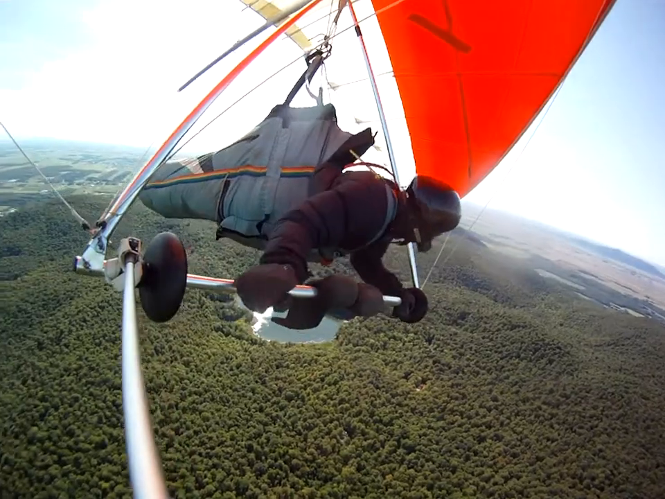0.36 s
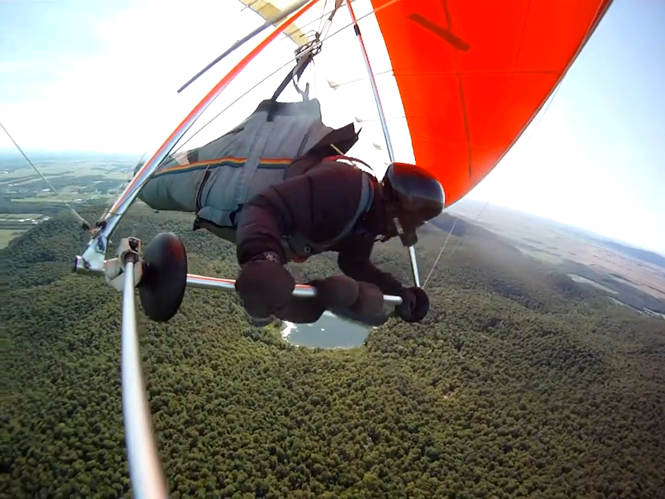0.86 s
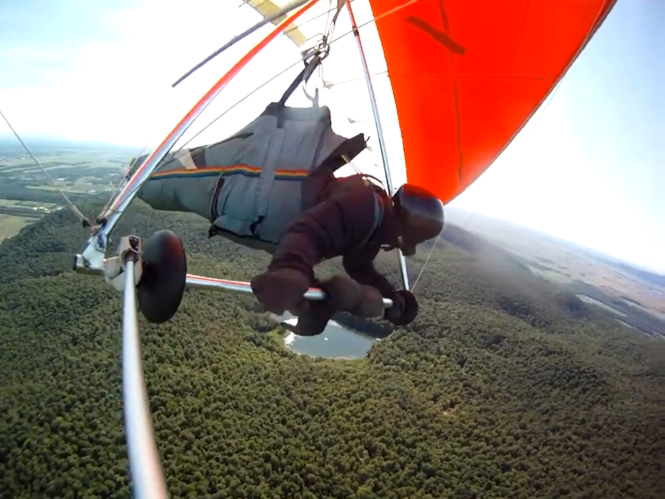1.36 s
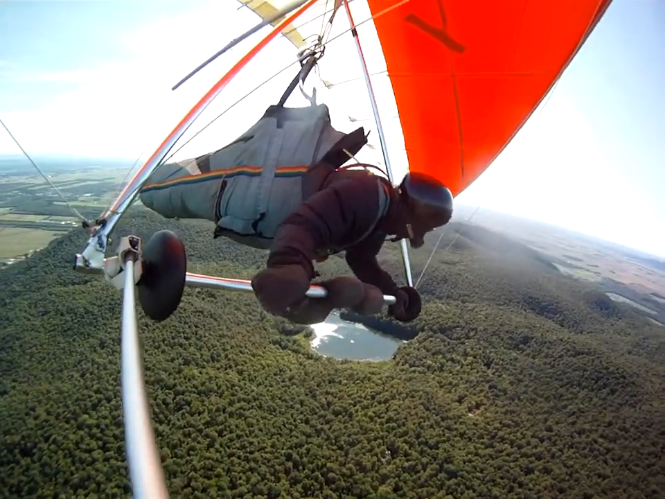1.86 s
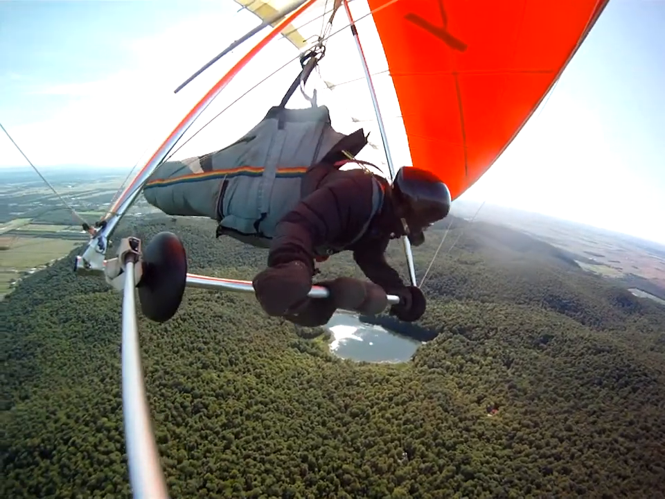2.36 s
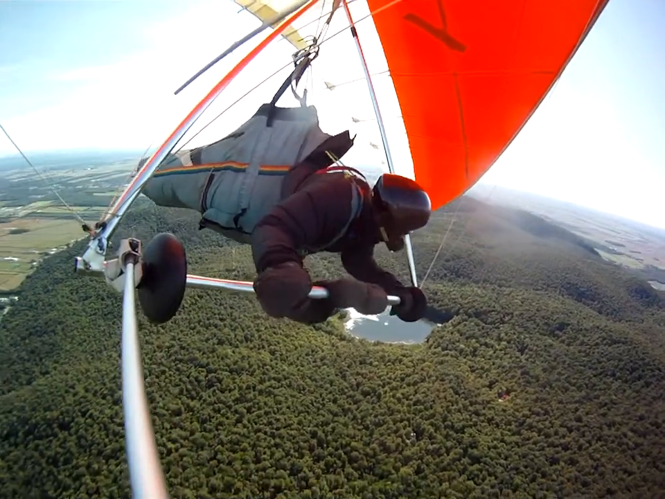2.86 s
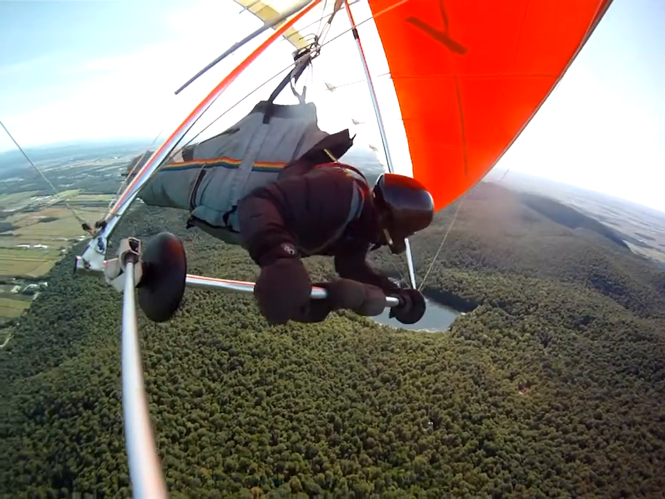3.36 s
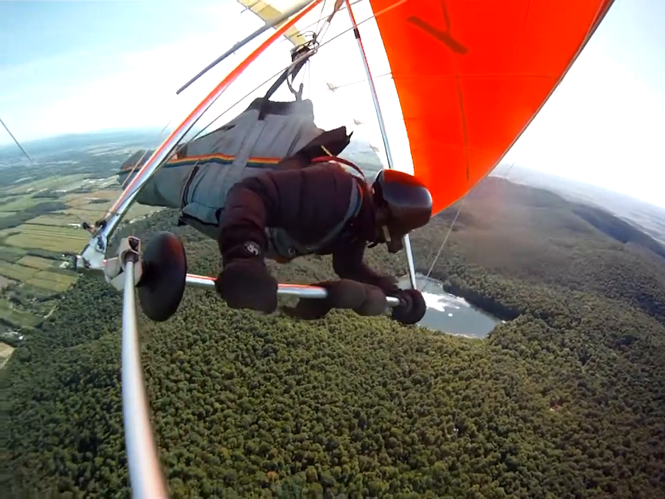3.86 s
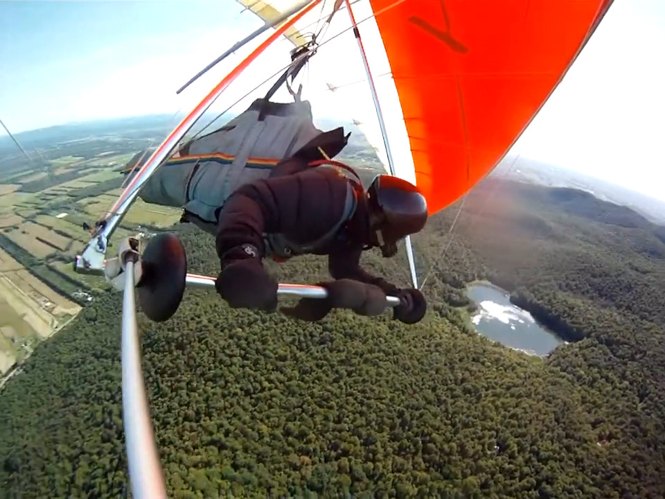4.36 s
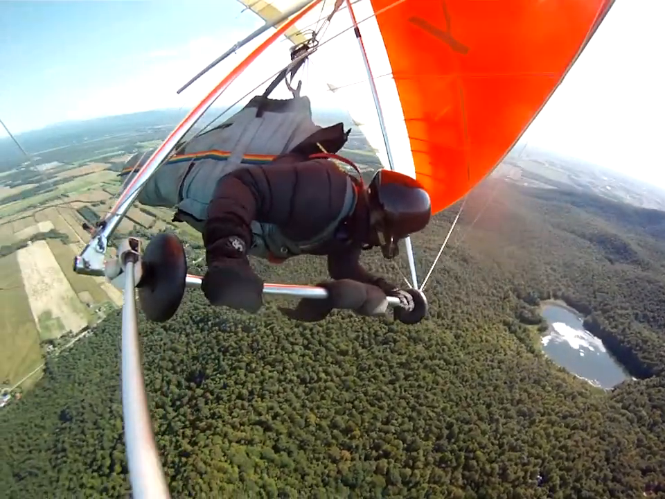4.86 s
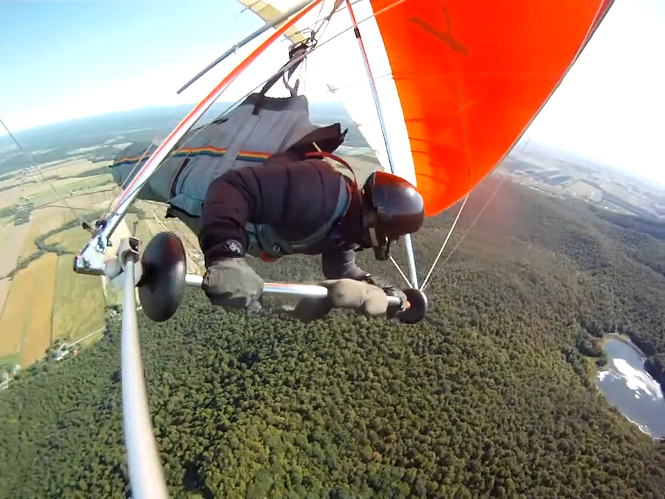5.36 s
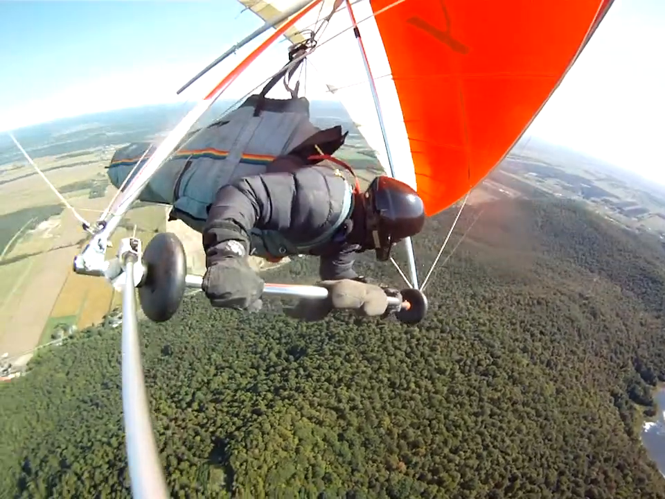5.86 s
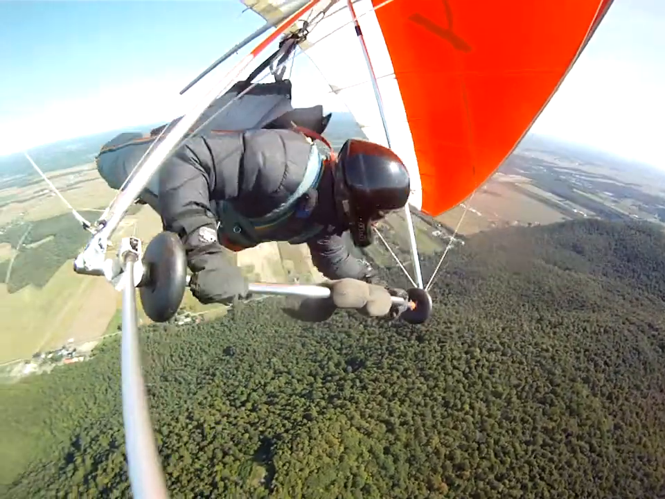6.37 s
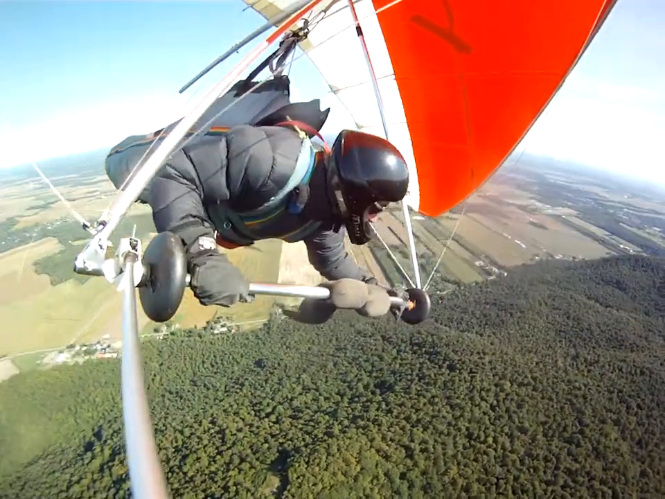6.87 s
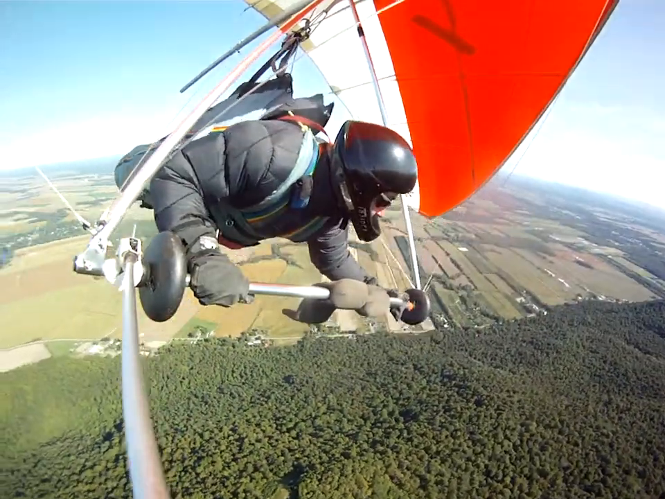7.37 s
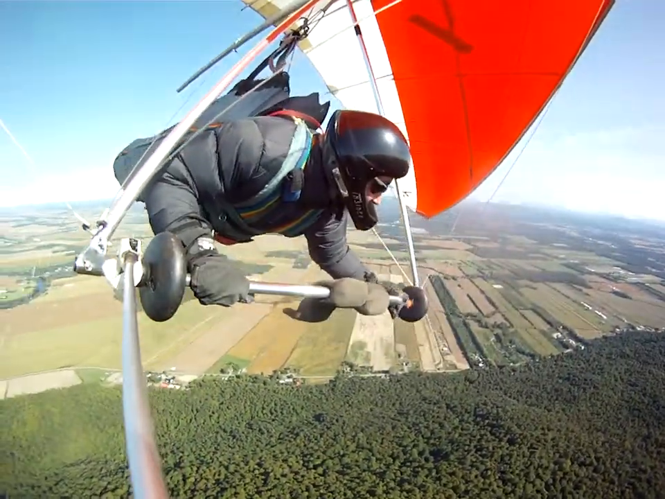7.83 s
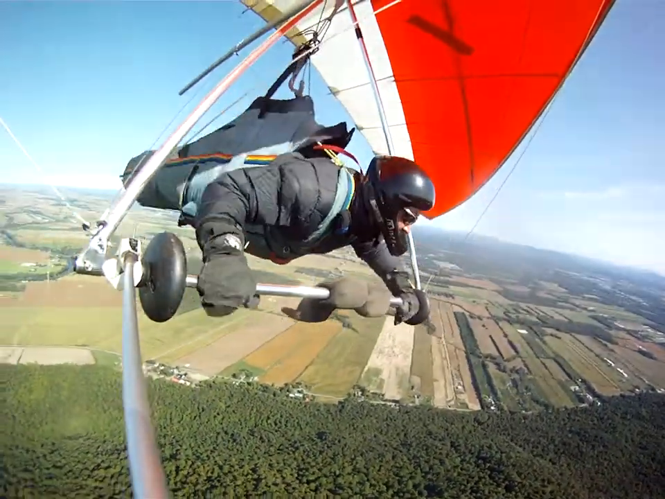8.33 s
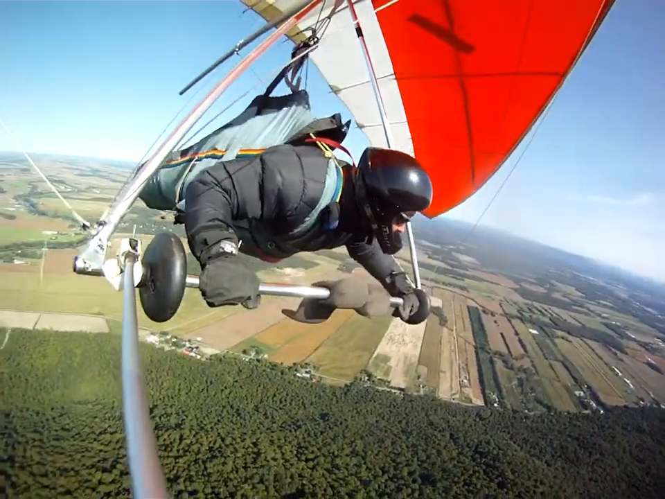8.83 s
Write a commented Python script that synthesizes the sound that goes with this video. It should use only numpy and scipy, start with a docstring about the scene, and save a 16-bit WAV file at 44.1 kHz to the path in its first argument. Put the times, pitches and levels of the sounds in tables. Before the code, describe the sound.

Steady wind rushes past a small hard-cased microphone, with a hollow howl and hiss, then turns rough, with heavy buffets, ticks and creaks.

```python
"""Wind rushes past a small camera in a hard housing on a glider in flight.
The stream is shaped noise: eddies buffet the housing, the air howls and roars round it and hisses over its port.
Hard buffets are short pressure swings; the mount ticks and creaks, which rings the housing; a faint fizz comes once.
A fast limiter ducks after the hardest buffets, and the sound is sampled coarsely, each sample held."""
import sys
import numpy as np
from scipy import signal
from scipy.fft import rfft, irfft
from scipy.io import wavfile
from scipy.ndimage import uniform_filter1d

SR = 44100
rng = np.random.default_rng(int(sys.argv[2]) if len(sys.argv) > 2 else 0)


def wav_out(sig):
    """Save sig, one row per channel (or a flat mono array), as 16-bit PCM at SR to the path in sys.argv[1]."""
    wavfile.write(sys.argv[1], SR, np.round(np.clip(np.atleast_2d(sig).T, -1, 1) * 32767).astype(np.int16))


def field_ratio(decibels):
    """Amplitude ratio for a level in dB (20 dB per decade); scalars and array-likes work."""
    return 10 ** (np.asarray(decibels, dtype=float) / 20)


N = 406602  # length of the scene in samples


def read(points, hz):
    """Reads a spectrum table at the frequencies hz, in straight lines over log frequency."""
    table_hz, value = np.transpose(points)
    return np.interp(np.log(hz + 1), np.log(table_hz + 1), value)


def evened(x):
    """Scales a signal to rms 1."""
    return x / np.sqrt(np.mean(x ** 2) + 1e-20)


def add(mix, start_s, sound):
    """Mixes a sound in at a start time, cut off at the end of the mix."""
    part = mix[round(start_s * SR):][:len(sound)]
    part += sound[:len(part)]


def wobble(fastest_hz):
    """Slow random wandering of rms 1: noise rolled off above a rate."""
    hz = np.fft.rfftfreq(N, 1 / SR)
    spectrum = rfft(rng.standard_normal(N)) / (1 + (hz / fastest_hz) ** 2)
    return evened(irfft(spectrum, N))


def turbulence(spectrum, patchy_db, size, scale=lambda t: np.ones(len(t))):
    """Noise of rms 1 with drifting loud and soft patches; scale(t) stretches its frequency axis over time."""
    frames = N * 4 // size + 5
    hz = np.fft.rfftfreq(size, 1 / SR)
    real, imaginary, patches = rng.standard_normal((frames, len(hz), 3)).T
    patches = uniform_filter1d(patches, size=6, axis=0)  # smooth across frequency
    patches = evened(uniform_filter1d(patches, size=10, axis=1))  # and across time
    frame_s = np.arange(frames) * size / 4 / SR
    shape_db = read(spectrum, hz[:, None] / scale(frame_s))
    short_spectra = (real + 1j * imaginary) * field_ratio(shape_db + patchy_db * patches)
    sound = signal.istft(short_spectra, nperseg=size, noverlap=size * 3 // 4)[1]
    return evened(sound[:N])


def wind():
    """Four parts of one air stream: all follow its broken flow, all but the buffeting its speed and flutter,
    the roar and hiss its puffs."""
    # the air stream: (time [s], rush over cruising speed [dB],
    # how far the flow has broken away from the housing [about 0 usual, 1 fully])
    air = [(0, .5, 0.044), (.6, 1, -0.16), (1.0, 0, 0.024), (1.7, -.5, 0.083), (2.1, 0, -0.1),
           (2.7, 0, 0.038), (3.1, 0, -0.045), (3.8, -.5, -0.089), (4.4, -.5, -0.11), (4.8, 2.5, 0.026),
           (5.2, 4, -0.18), (5.8, 2.5, 0.1), (6.35, 0, 0.081), (6.6, 0.5, 0.76), (7.0, -1, 0.86),
           (7.4, -2, 1.14), (7.8, 0, 0.78), (8.15, -1, 1), (8.45, 1, 1.08), (8.8, 0, 1), (9.0, 2, 0.35),
           (9.22, 1.5, 0)]
    time_s, speed_db, broken = np.transpose(air)
    t = np.arange(N) / SR
    speed_db, broken = np.interp(t, time_s, speed_db), np.interp(t, time_s, broken)
    flutter = wobble(fastest_hz=29.2)
    puffs_db = puffs()
    low = buffeting(t, broken)
    middle = howl(t, speed_db, broken, flutter) + roar(speed_db, broken, flutter, puffs_db)
    return low + middle + hiss(speed_db, broken, flutter, puffs_db)


def puffs():
    """Short puffs across the port, as a curve of extra dB for the roar and the hiss."""
    # puffs: (start [s], length [s], lift before each part takes its share [dB])
    puff_list = [(0.258, 0.14, 2), (1.95, 0.14, 3.5), (2.803, 0.093, 2), (5.516, .1, 3), (6.94, 0.056, 4),
                 (7.696, 0.086, 5), (7.81, 0.097, 2), (8.363, 0.054, 1), (8.503, 0.064, 1.5),
                 (8.602, 0.074, 4)]
    lift_db = np.zeros(N)
    for start_s, length_s, db in puff_list:
        add(lift_db, start_s, db * signal.windows.tukey(round(length_s * SR), .6))
    return lift_db


def buffeting(t, broken):
    """Large eddies strike the housing; stronger ones are larger, so their rumble is deeper."""
    # eddies that strike the housing: (time [s], buffeting level [dB])
    eddies = [(0, -20), (.9, -19), (1.8, -19), (2.15, -17), (2.4, -19), (2.8, -18), (3.2, -19.5),
              (3.8, -24.5), (4.6, -21), (5.2, -18), (5.8, -19.5), (6.6, -17.5), (7.05, -16), (7.5, -15),
              (7.9, -15), (8.5, -19), (9.0, -14), (9.22, -19.5)]
    # colour of the rumble before it is stretched: (frequency [Hz], relative density [dB per Hz])
    colour = [(5, -16), (20, -16.5), (65, -0.5), (180, -1.5), (330, -5.5), (520, -22.5), (800, -50),
              (1500, -54)]
    usual_db, deeper_per_db = -17.5, 0.05  # the pitch sinks by this share for each dB over usual
    level_db = np.interp(t, *np.transpose(eddies))
    pitch_scale = np.clip(1 - deeper_per_db * (level_db - usual_db), .5, 2)
    rumble = turbulence(colour, patchy_db=0.22, size=2048, scale=lambda when: np.interp(when, t, pitch_scale))
    lumps_db = (0.6 + 0.68 * broken) * wobble(fastest_hz=21)  # lumpier in broken flow
    return rumble * field_ratio(level_db + lumps_db)


def howl(t, speed_db, broken, flutter):
    """Air howls round the housing: a band of noise whose pitch wavers, and sags as the flow breaks away."""
    # colour of the howl: (multiple of its pitch [ratio], relative density [dB])
    colour = [(.3, -13.5), (.6, -9), (.86, -2.5), (1.04, -1.5), (1.3, -7.5), (1.7, -15.5), (3, -56)]
    pitch_hz, sag, waver = 515, 0.12, 0.017  # sag and waver are shares of the pitch
    moving_hz = pitch_hz * (1 - sag * broken + waver * wobble(fastest_hz=2.7))
    noise = turbulence(colour, patchy_db=0.36, size=2048, scale=lambda when: np.interp(when, t, moving_hz))
    level_db = -16 - 0.27 * speed_db - 4.5 * broken  # a faster stream howls a little less
    return noise * field_ratio(level_db + 1.23 * flutter)


def roar(speed_db, broken, flutter, puffs_db):
    """Air roars round the housing: noise that grows with speed and puffs, and drops in broken flow."""
    # colour of the roar: (frequency [Hz], relative density [dB per Hz])
    colour = [(300, -15), (700, -3.5), (1030, -3), (1400, -11.5), (2500, -44)]
    level_db = -23 + 0.91 * speed_db - 5 * broken
    return field_ratio(level_db + 0.67 * puffs_db + 0.3 * flutter) * turbulence(colour, patchy_db=0.27, size=1024)


def hiss(speed_db, broken, flutter, puffs_db):
    """Air hisses over the port: the part of the stream that grows most with speed, split into coarse and fine."""
    # colour of the hiss: (frequency [Hz], relative density [dB per Hz])
    colour = [(300, -26), (900, -15), (1400, 3.5), (2050, 3), (2400, -2), (2800, -4), (3180, -13.5),
              (3730, -6), (4100, -14.5), (5000, -22.5), (5600, -39.5), (6500, -38)]
    noise = turbulence(colour, patchy_db=0.5, size=512)
    split_hz = 3200
    coarse = signal.oaconvolve(noise, signal.firwin(255, split_hz, fs=SR), "same")
    fine = noise - coarse
    # the fine hiss follows speed and puffs a little less, and drops less in broken flow
    fine_db = -0.089 * speed_db + 0.59 * puffs_db + 0.5 * broken
    level_db = -31.5 + 1.34 * speed_db - .8 * broken
    flutter_db = (0.92 + 0.34 * broken) * flutter
    return field_ratio(level_db + flutter_db) * (field_ratio(puffs_db) * coarse + field_ratio(fine_db) * fine)


def thumps():
    """Each hard buffet is one pressure swing, push then pull: a sine under a short bell curve."""
    # hard buffets: (time [s], level of the sine under its bell curve [dB], swing [Hz])
    buffets = [(6.386, -8, 169), (6.652, 3, 118), (6.97, 1, 129), (7.097, -1.5, 149), (7.892, -3.5, 190),
               (7.991, -7, 120), (8.31, 0, 160), (8.554, 0, 172), (8.639, 1, 179)]
    out = np.zeros(N)
    for start_s, db, hz in buffets:
        cycles = np.arange(0, 2, hz / SR)
        bell = np.exp(-((cycles - .45) / .5) ** 2)
        add(out, start_s, field_ratio(db) * np.sin(2 * np.pi * cycles) * bell)
    return out


def ring(blow_hz, narrow_db):
    """The housing struck once, peak 1: fading tones, strongest near the blow's own pitch."""
    # what the housing rings with: (frequency [Hz], relative level [dB], time to fade by 60 dB [s])
    modes = [(2240, 3.5, 0.011), (2850, -1.5, 0.018), (3740, -5, 0.01), (3796, -5, 0.01),
             (4290, -3, 0.0097), (4900, -11, .01), (5700, -8.5, 0.013)]
    t = np.arange(2000) / SR
    sound = np.zeros(len(t))
    for hz, db, fade_s in modes:
        loss_db = narrow_db * np.log2(hz / blow_hz) ** 2  # narrow_db is the loss one octave away
        sound += field_ratio(db - loss_db - 60 * t / fade_s) * np.sin(2 * np.pi * hz * t)
    sound = sound * (1 - np.exp(-t / 0.00043)) ** 2  # a contact of about a millisecond
    return sound / abs(sound).max()


def mount():
    """The mount works against the housing: its single ticks and its creaks together."""
    return ticks() + creaks()


def ticks():
    """Each tick of the mount is one blow that rings the housing."""
    # ticks: (time [s], peak level [dB], pitch of the blow [Hz], loss one octave away [dB])
    tick_list = [(0.555, -20, 2850, 32), (1.3824, -29, 4000, 50), (1.3974, -26, 4000, 15),
                 (1.4037, -10.5, 4200, 13), (1.4543, -17, 4300, 26), (1.5115, -30, 5000, 30),
                 (1.515, -25, 4000, 45), (2.826, -21, 2000, 40), (6.0367, -17, 2900, 20),
                 (6.6423, -23, 2900, 20), (7.002, -22, 2600, 18), (7.26, -20, 2980, 24),
                 (7.8575, -30, 3700, 60), (8.0157, -22, 2800, 60), (8.0935, -11.5, 2900, 37),
                 (8.2302, -22.5, 2800, 50), (8.6153, -25, 3600, 30)]
    out = np.zeros(N)
    for start_s, db, blow_hz, narrow_db in tick_list:
        add(out, start_s, field_ratio(db) * ring(blow_hz, narrow_db))
    return out


def creaks():
    """Each creak of the mount is a run of quick uneven slips that ring the housing, with a jittering pitch."""
    # creaks: (start [s], length [s], level against the other creaks [dB])
    creak_list = [(6.465, 0.087, -38), (6.718, .06, -40), (7.015, 0.093, -39.5), (7.797, 0.1, -35),
                  (7.894, 0.095, -35), (8.108, .065, -37), (8.177, .075, -46), (8.625, .045, -38)]
    slips_per_s, unevenness, pitch_jitter = 160, 0.41, .03  # the last two are shares
    steps = np.cumsum(slips_per_s * (1 + unevenness * wobble(fastest_hz=57.3)) / SR)
    slips = np.diff(np.floor(steps), prepend=0)  # one click at each whole step
    slips = slips * field_ratio(2.3 * rng.standard_normal(N))  # uneven strength
    swell = np.zeros(N)
    for start_s, length_s, db in creak_list:
        add(swell, start_s, field_ratio(db) * signal.windows.tukey(round(length_s * SR), .4))
    ringing = signal.oaconvolve(slips * swell, ring(blow_hz=2850, narrow_db=70))[:N]
    # reading the sound a little faster and slower jitters its pitch
    sway = wobble(fastest_hz=120)
    sway = sway - sway.mean() - uniform_filter1d(sway, size=1000)
    read_at = np.arange(N) + pitch_jitter * np.cumsum(sway)
    bent = np.interp(read_at, np.arange(N), ringing)
    return evened(bent) * np.sqrt(np.mean(swell ** 2))  # as strong overall as the swells


def fizz():
    """A faint, thin, high fizz: flickering noise that swells and fades once."""
    # colour of the fizz: (frequency [Hz], relative density [dB per Hz])
    colour = [(3000, -30), (3900, -2), (4400, -8), (5000, 2), (5500, -3.5), (6500, -15)]
    start_s, length_s, level_db = 7.6, 1.45, -54
    swell = np.zeros(N)
    add(swell, start_s, signal.windows.tukey(round(length_s * SR), .6))
    flicker_db = 1.5 * wobble(fastest_hz=20.5)
    return swell * field_ratio(level_db + flicker_db) * turbulence(colour, patchy_db=1.2, size=512)


def scene():
    """Everything that reaches the one microphone."""
    return (wind() + thumps() + mount() + fizz())[None]


def limiter_gain(x, ceiling_db, recover_db_per_s, fall_s):
    """Gain drops by what the level tops the ceiling, a moment late, and creeps back at a steady rate."""
    creep_db = np.arange(N) * recover_db_per_s / SR
    level_db = 20 * np.log10(abs(x) + 1e-9)
    held_db = np.maximum.accumulate(level_db + creep_db) - creep_db  # each peak sinks steadily
    over_db = np.maximum(held_db - ceiling_db, 0)
    step = 1 / (fall_s * SR)
    return field_ratio(-signal.lfilter([step], [1, step - 1], over_db))


def top_cut(x):
    """Nothing passes above the cut-off."""
    return signal.sosfilt(signal.butter(12, 15530, fs=SR, output="sos"), x)


def record(dry):
    """Limiter, bass cut, then 12 kHz sampling with each sample held, which mirrors the sound round 12 kHz."""
    gain = limiter_gain(dry[0], ceiling_db=-4.5, recover_db_per_s=64, fall_s=0.00044)
    limited = dry[0] * gain
    bass_cut = signal.lfilter(*signal.butter(1, 30, "high", fs=SR), limited)
    before_sampling = signal.firwin(129, 5720, window=("kaiser", 6), fs=SR)
    smooth = signal.oaconvolve(bass_cut, before_sampling, "same")
    coarse = signal.resample_poly(smooth, 40, 147)  # 44.1 to 12 kHz
    held = np.repeat(coarse, 4)  # each sample four times, at 48 kHz
    held = signal.resample_poly(held, 147, 160)  # back to 44.1 kHz
    treble_cut = signal.firwin(511, 15300, window=("kaiser", 9), fs=SR)
    held = signal.oaconvolve(held, treble_cut, "same")
    finished = np.pad(held, (0, 8))[None, :N]
    return top_cut(finished)


dry = scene()
out = record(dry)
wav_out(out)
```